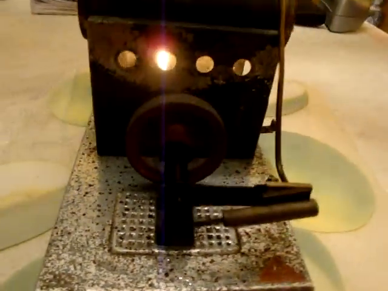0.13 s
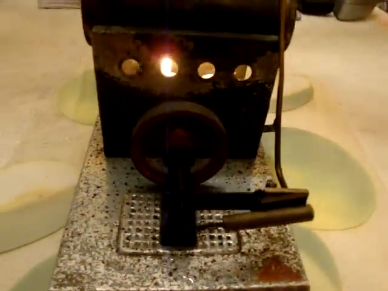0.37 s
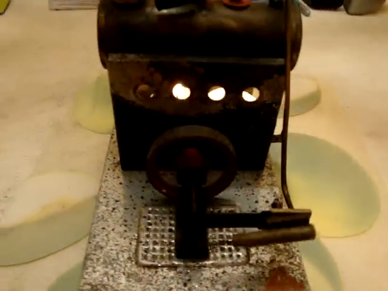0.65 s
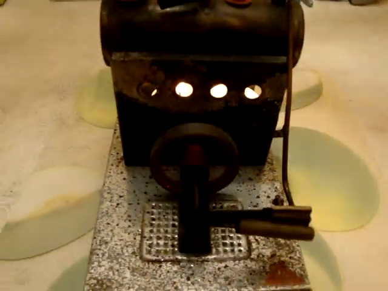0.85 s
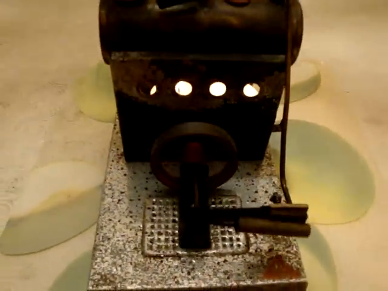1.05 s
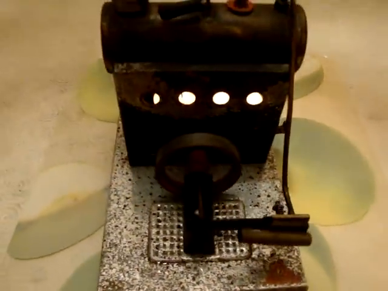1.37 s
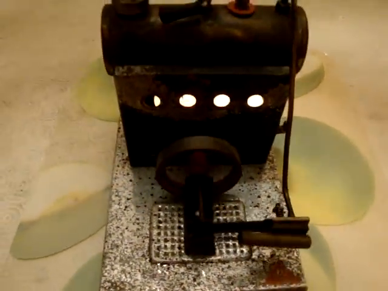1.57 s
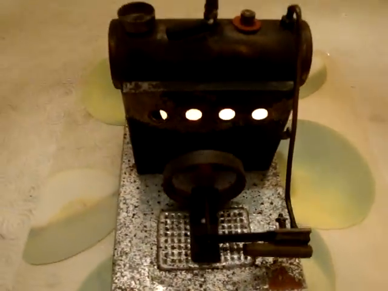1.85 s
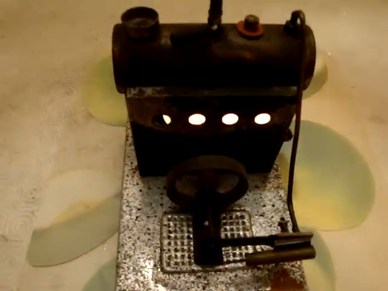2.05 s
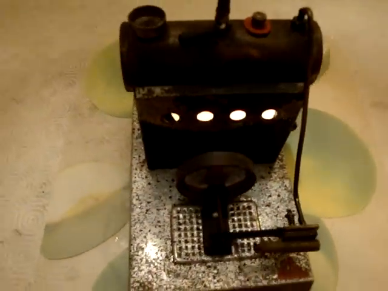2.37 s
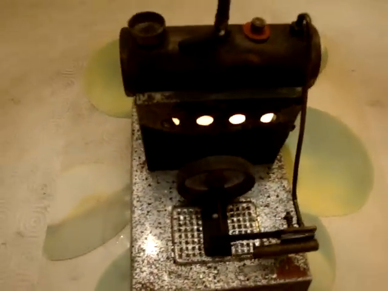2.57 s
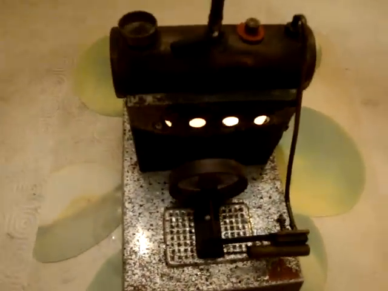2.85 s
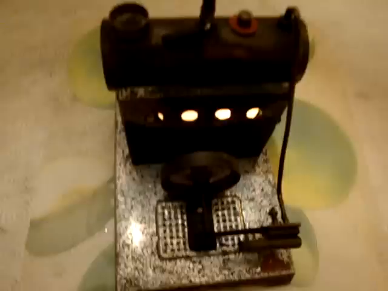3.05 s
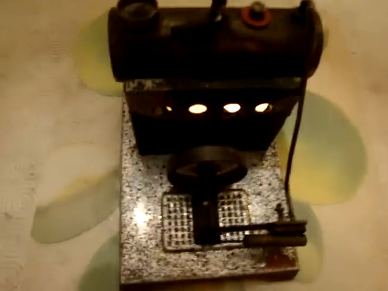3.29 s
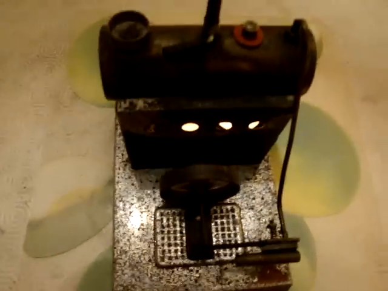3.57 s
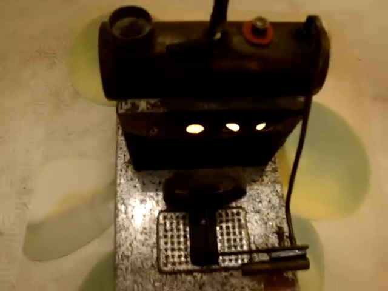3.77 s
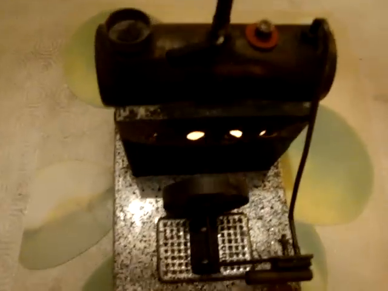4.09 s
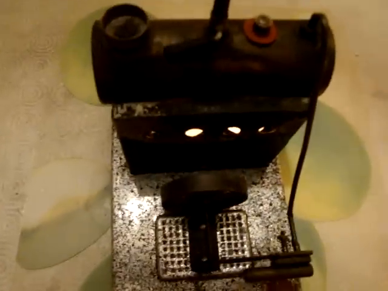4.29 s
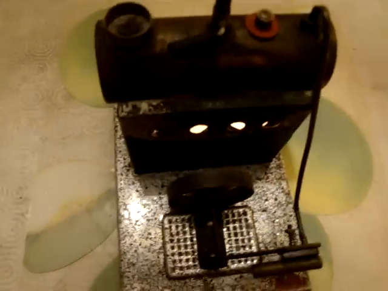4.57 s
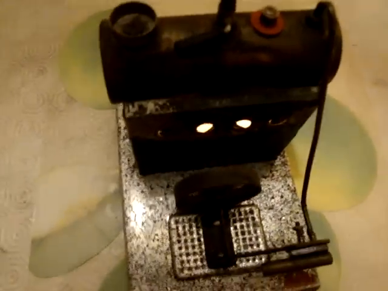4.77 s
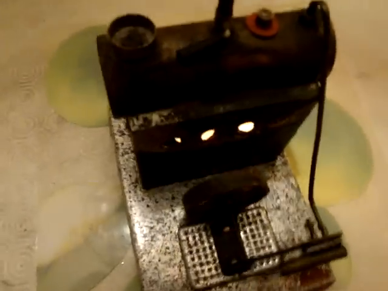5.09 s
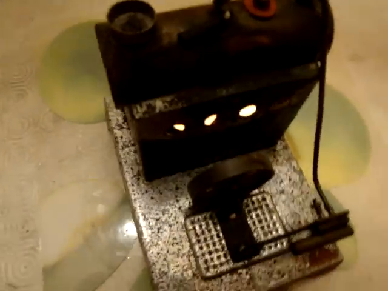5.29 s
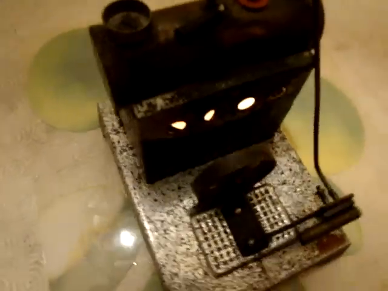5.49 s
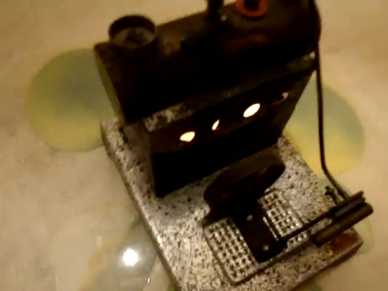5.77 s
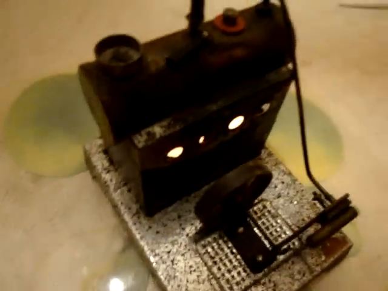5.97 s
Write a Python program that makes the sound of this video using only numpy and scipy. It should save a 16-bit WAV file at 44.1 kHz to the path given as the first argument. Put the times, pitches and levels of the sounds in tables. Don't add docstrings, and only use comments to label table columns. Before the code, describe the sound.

From 0 s a toy steam engine is already running on a table, close to a small handheld microphone. Around nine tinny piston knocks a second form a rapid, almost even chuffing, quickening very slightly; each knock has a double-hit edge, a short metal ring and a spit of steam lasting milliseconds. Between knocks come faint slack taps and gritty rubbing. A steady hiss of flame and steam lies beneath throughout. The front-on sound is brightest until about 1.2 s. Dull table bumps land near 1.06 s, softer at 1.2 s, and again at 2.27 s. From 2 to 4 s the microphone moves round the side: less spit, more ringing of the sheet-metal base. From 4 s the cylinder rocks on its seat nearly every turn, adding extra clacks and a stronger, busier clatter until the sound stops mid-run at about 6.1 s. Small, dry space; faint close echoes, little bass.

```python
import sys
import numpy as np
from scipy import signal
from scipy.fft import rfft, irfft
from scipy.io import wavfile

SR = 44100
rng = np.random.default_rng(int(sys.argv[2]) if len(sys.argv) > 2 else 0)


def level_to_linear(level):
    exponent = np.asarray(level, float) / 20
    return 10 ** exponent


def dump(signal):
    limited = np.clip(np.atleast_2d(signal).T, -1, 1)
    pcm = np.round(limited * 32767).astype(np.int16)
    wavfile.write(sys.argv[1], SR, pcm)


N = 270765

# frequency in Hz, level in dB per Hz.
HISS_SPECTRUM = [(40, -28), (60, -4.5), (75, -3.5), (100, -8.5), (120, 3.5), (170, -1), (280, 9), (500, 1),
                 (1000, 11), (3000, -1), (5000, -7.5), (7500, -6.5), (9800, -4), (11000, -43.5)]
# time in seconds, rattle in dB, side modes of the base in dB,
# front parts in dB.
MIC_VIEW = [
    (0, -43, -10, 5),
    (1.2, -41.5, -10.5, 6.5),
    (2.2, -41, -13.5, -8.5),
    (3.2, -41.5, -4.5, -9),
    (4, -39.5, -8, -6),
    (5, -39, -4.5, -6.5),
    (6.14, -40.5, -10, -6.5),
]
# share of the turn, level in dB.
STROKE_RUB = [(0, 10), (.2, 3.5), (.36, 4.5), (.46, -6), (.52, 1), (.61, -19), (.7, 3), (.85, 3.5),
              (1, 5.5)]

# frequency in Hz, level in dB, decay by 60 dB in seconds.
BASE_MODES = [(936.3, -14.5, 0.13), (973.6, -1.5, 0.036), (467, -23.5, 0.036), (609, -13, 0.042),
              (750.3, -11, 0.025), (825.7, -9, 0.049), (1131.2, -5.5, 0.076), (1170.4, -18, 0.19)]
CASING_MODES = [(1475.4, -8, 0.031), (1551, -3, 0.017), (1611.5, -9, 0.026), (1673, -22, 0.19)]
CYLINDER_MODES = [(2100.5, -5, 0.013), (2229.7, -2, 0.0097), (2444, -7, 0.02), (2834, -12.5, 0.018),
                  (2967, -16, 0.024), (3518, 2, 0.0098)]
FITTING_MODES = [(4130, -1, 0.0032), (4920, -15.5, 0.011), (5900, -3.5, 0.0033), (6940, -16, 0.012),
                 (8003, -4.5, 0.014), (9974, 0.5, 0.012)]
TABLE_MODES = [(288, 0.5, 0.05), (400, -8, 0.038), (506, 0.5, 0.042)]

DEAD_CENTRES = [-.2545, .2071, .6679, 1.129, 1.5826, 2.0322, 2.4774, 2.9205, 3.3585, 3.7959, 4.2285, 4.6608,
                5.0938, 5.5229, 5.9474, 6.37]
# time in seconds, ring of base, casing and cylinder in dB,
# steam spit in dB.
KNOCK_LEVELS = [(0, -28.5, -14, -21, -21), (.6, -21.5, -18.5, -20, -27), (1.2, -22, -15.5, -37, -29.5),
                (1.7, -21, -19, -25, -25), (2.1, -14.5, -17, -27, -25), (2.7, -20.5, -21, -31.5, -28),
                (3.2, -20.5, -17.5, -30, -25.5), (3.8, -15, -20, -21.5, -22),
                (4.5, -16.5, -18.5, -21.5, -24.5), (5.1, -16, -17, -26, -23), (5.6, -13.5, -14, -25, -21),
                (6.14, -15, -16, -22.5, -24.5)]
# time in seconds, harder in dB, casing in dB, wetter steam in dB.
UNUSUAL_KNOCKS = [(0.0872, 5.5, 3.5, 0.5), (0.2068, 6.5, 4, 0.5), (0.5506, 2.5, 0.5, -3),
                  (1.1307, 5.5, -11, -6), (1.2423, 0.5, -10, -4), (1.3553, -5, -3.5, -0.5),
                  (1.4685, 1, -4, -2), (1.5812, -4, 1.5, -0.5), (1.695, 3.5, -5, -0.5),
                  (1.92, 0.5, 4.5, 1.5), (2.1427, 1.5, -1.5, -1), (2.2545, 1.5, -13, 0), (2.4773, 2, 2, 0),
                  (2.7, -1, 4.5, 0.5), (2.811, 2.5, 4.5, 3.5), (3.4678, -4, -1.5, -1.5),
                  (3.5781, 2, 0.5, 2.5), (3.903, -4, 0.5, 1.5), (4.0149, 7, 1, 2), (4.1219, 2.5, 1, -2),
                  (4.2271, 0.5, 4.5, -2.5), (4.3376, 3.5, -3, 0.5), (4.445, -3, 1, -3),
                  (4.7729, -0.5, -2, 6), (5.0925, -3, -1.5, 2), (5.2022, -1, 3, -2.5), (5.3083, 2.5, -3, 0),
                  (5.5234, 1, 1.5, -1), (5.8409, -1, 1, -7), (5.9489, -0.5, 0.5, 2)]

# share of the turn, base, casing and cylinder in dB,
# loss on every other turn in dB.
LINKAGE_TAPS = [(.19, -60, -36, -38, 0), (.67, -40, -32, -42.5, -9), (.895, -34, -32.5, -42.5, -0.5)]
# base, casing, cylinder in dB against half the knock's swing.
RETURN_COLOUR = [-16, -24, -34.5]
# time in seconds, harder in dB.
UNUSUAL_RETURNS = [(.261, -0.5), (.38, -12), (.61, -23), (.84, -11), (.95, -17), (1.07, -12), (1.19, -6),
                   (1.3, -23), (1.52, -7), (1.64, -6.5), (1.862, 2.5), (2.09, -6.5), (2.2, -5), (2.42, 1.5),
                   (2.64, -14), (2.864, 4), (3.957, -4), (4.07, -1), (4.18, -5), (4.39, 2), (4.606, 4.5),
                   (4.714, 2), (4.83, -3.5), (5.04, -3.5), (5.147, -2.5), (5.253, 2.5), (5.36, -5),
                   (5.79, 2), (5.89, -8)]
# time in seconds, cylinder ring in dB.
ROD_CLINKS = [(.0097, -36), (.1848, -39), (.244, -32.5), (.352, -35.5), (.5833, -39), (.679, -34),
              (.7007, -35), (.715, -38), (.8763, -37), (1.2788, -36.5), (1.3353, -34.5), (1.562, -35),
              (1.7312, -34.5), (4.022, -24.5), (4.047, -38), (4.1125, -27.5), (4.126, -31), (4.779, -26),
              (4.87, -35.5)]
# time in seconds, base ring in dB.
SEAT_ROCKS = [(.0273, -38), (1.1147, -21.5), (1.7156, -34), (1.9551, -20.5), (3.2722, -21), (3.3438, -28),
              (3.5604, -25), (3.7688, -25.5), (3.8777, -28), (3.9339, -22), (3.992, -27), (4.0988, -19.5),
              (4.2087, -16.5), (4.246, -43), (4.5334, -19), (4.69, -25), (4.744, -22), (4.8027, -19.5),
              (4.8562, -17), (5.0691, -21), (5.0794, -16), (5.2903, -28), (5.396, -18.5), (5.5039, -18),
              (5.6131, -20), (5.7173, -16.5), (5.8233, -18), (5.9298, -17), (6.0356, -16), (6.1337, -18.5)]
# time in seconds, casing ring in dB.
CASING_JOLTS = [(.1679, -38), (.1925, -22.5), (.309, -41), (.4248, -27), (.5404, -30.5), (1.0011, -36),
                (1.2646, -31), (1.6827, -29), (2.104, -29), (2.3323, -37), (2.6616, -32.5), (2.8825, -36),
                (4.8281, -25.5), (5.6063, -30), (5.9218, -47)]
# base, casing, cylinder in dB.
CLINK_COLOUR = [2.5, -1, 5.5]
ROCK_COLOUR = [-5, -9, -16.5]
JOLT_COLOUR = [-12, 2.5, -13.5]
# time in seconds, peak in dB, pitch in Hz.
TABLE_BUMPS = [
    (1.061, -35, 400),
    (1.063, -36, 286),
    (1.063, -38, 476),
    (1.207, -44, 340),
    (2.265, -39.5, 432),
    (2.266, -45.5, 342),
]


def in_time(rows):
    s, *columns = np.transpose(rows)
    return [np.interp(np.arange(N) / SR, s, c) for c in columns]


def filtered(x, order, hz, kind):
    return signal.sosfilt(signal.butter(order, hz, kind, fs=SR, output="sos"), x)


def ring(clicks, hz, t60):
    r, w = level_to_linear(-60 / (t60 * SR)), 2 * np.pi * hz / SR
    return signal.lfilter([0, np.sin(w)], [1, -2 * r * np.cos(w), r * r], clicks + 1e-18)


def soften(x, seconds):
    r = np.exp(-1 / (seconds * SR))
    return signal.lfilter([1 - r], [1, -r], x)


def strikes(times, db, scatter_db):
    clicks = np.zeros(N)
    at = np.clip((times * SR).astype(int), 0, N - 1)
    clicks[at] = level_to_linear(db + scatter_db * rng.standard_normal(len(times)))
    return clicks


def hiss():
    hz = np.maximum(np.fft.rfftfreq(N, 1 / SR), 1)
    points_hz, points_db = np.transpose(HISS_SPECTRUM)
    colour_db = np.interp(np.log(hz), np.log(points_hz), points_db)
    noise = irfft(rfft(rng.standard_normal(N)) * level_to_linear(colour_db), N)
    return level_to_linear(-49.5) * noise / noise.std()


def rattle(rub_db):
    slips_per_s = 700
    clumps = soften(soften(rng.standard_normal(N), 0.0025), 0.0025)
    sizes = level_to_linear(3.0 * np.minimum(rng.exponential(1, N), 2.8)) * rng.choice([-1, 1], N)
    slipping = rng.random(N) < slips_per_s / SR
    return sizes * slipping * level_to_linear(rub_db - 1 + 3.5 * clumps / clumps.std())


def turn_times():
    return np.interp(np.arange(3, 60) / 4 - .25, np.arange(len(DEAD_CENTRES)), DEAD_CENTRES)


def piston():
    s, *levels = np.transpose(KNOCK_LEVELS)
    times = turn_times()[1:-1]
    knocks = np.transpose([times] + [np.interp(times, s, level) for level in levels])
    for at, harder, casing, wetter in UNUSUAL_KNOCKS:
        turn = np.argmin(abs(times - at))
        knocks[turn, 0] = at
        knocks[turn, 1:] += [harder, casing, 0.13 * casing + wetter, wetter]
    return knocks


def spit(low_db, taps):
    droplets, splutter_s, droplet_db = 3, 0.0054, -8
    knocks = piston()
    opening = strikes(knocks[:, 0] - .0015, knocks[:, 4], scatter_db=1)
    for late in rng.random((droplets, len(knocks))):
        level_db = knocks[:, 4] + droplet_db - 8 * late
        opening += strikes(knocks[:, 0] + splutter_s * late, level_db, scatter_db=4)
    puff = soften(soften(soften(level_to_linear(35) * opening, .0008), .0008), .0008)
    tail = soften(puff, 0.0036) * level_to_linear(-12)
    leak = level_to_linear(35) * strikes(taps[:, 0], taps[:, 3], scatter_db=1)
    leak = soften(soften(leak, 0.0029), 0.006)
    full = filtered(rng.standard_normal(N), 2, [3300, 6800], "band")
    thin = filtered(rng.standard_normal(N), 2, 6800, "high")
    return level_to_linear(-4.0) * (puff + tail) * (level_to_linear(low_db + 2.5) * full + thin) + leak * full


def slack():
    starts, lengths = turn_times()[:-1], np.diff(turn_times())
    view, running = np.array(MIC_VIEW), np.array(KNOCK_LEVELS)
    front_db = np.interp(starts, view[:, 0], view[:, 3])[:, None]
    even = np.arange(1, len(starts) + 1)[:, None] % 2
    looped = []
    for share, *db, loss in LINKAGE_TAPS:
        looped.append(np.c_[starts + share * lengths, front_db + loss * even + db])

    back = starts + .488 * lengths
    odd = sum(db * (abs(back - s) < .03) for s, db in UNUSUAL_RETURNS)
    swing_db = np.interp(back, running[:, 0], running[:, 1]) / 2 + odd
    looped.append(np.c_[back, swing_db[:, None] + RETURN_COLOUR])
    looped = np.vstack(looped)
    jitter_s, scatter_db = .0005, 2
    looped += rng.standard_normal(looped.shape) * [jitter_s, scatter_db / 3, scatter_db, scatter_db]

    single = []
    for rows, colour in ((SEAT_ROCKS, ROCK_COLOUR), (ROD_CLINKS, CLINK_COLOUR), (CASING_JOLTS, JOLT_COLOUR)):
        single += [(s, *(db + np.array(colour))) for s, db in rows]
    taps = np.vstack([looped, single])
    return taps[(taps[:, 0] > .002) & (taps[:, 0] < N / SR)]


def contact(hz, seconds):
    push = np.hanning(round(seconds * SR) + 3)[1:-1]
    return 2 * np.cos(2 * np.pi * hz * np.arange(len(push)) / SR) * push / push.sum()


def part(modes, taps, column, slips, late_s, build_s, bounce_db, knock_db, tap_db, rattle_db):
    bounce_s = .0072
    knocks, rings = piston(), []
    hit_s, hit_db = knocks[:, 0] + late_s, knocks[:, column] + knock_db
    tapped_db = taps[:, min(column, 3)] + tap_db
    for hz, db, t60 in modes:
        blows = strikes(hit_s, hit_db, scatter_db=1.5)
        blows += strikes(hit_s + bounce_s, hit_db + bounce_db, scatter_db=2.5)
        blows += strikes(taps[:, 0] - build_s / 3, tapped_db, scatter_db=1.5)
        blows += level_to_linear(rattle_db) * slips
        blows = signal.oaconvolve(blows, contact(hz, np.clip(build_s, 0, .008)))[:N]
        rings.append(level_to_linear(db) * ring(blows, hz, t60))
    return rings


def engine():
    level_db, side_db, low_db = in_time(MIC_VIEW)
    knocks, taps = piston()[:, 0], slack()
    turn_starts = np.r_[knocks[0] - .118, knocks, knocks[-1] + .105]
    turns = np.interp(np.arange(N) / SR, turn_starts, np.arange(len(turn_starts)))
    slips = rattle(level_db + np.interp(turns % 1, *np.transpose(STROKE_RUB)))

    base = part(BASE_MODES[:2], taps, column=1, slips=slips, late_s=0.00066, build_s=0.0025,
                bounce_db=-4.0, knock_db=-4.0, tap_db=1.0, rattle_db=-4.5)
    base += part(BASE_MODES[2:], taps, column=1, slips=slips, late_s=0.00038, build_s=0.0025,
                 bounce_db=-23, knock_db=-2.5, tap_db=-1.5, rattle_db=-3.5)
    casing = part(CASING_MODES, taps, column=2, slips=slips, late_s=-0.00035, build_s=0.0031,
                  bounce_db=-30.0, knock_db=-3.0, tap_db=0.5, rattle_db=-12.5)
    cylinder = part(CYLINDER_MODES[:-1], taps, column=3, slips=slips, late_s=-0.000905, build_s=0.00317,
                    bounce_db=-9, knock_db=-0.5, tap_db=4.5, rattle_db=-8.5)
    cylinder += part(CYLINDER_MODES[-1:], taps, column=3, slips=slips, late_s=-0.0005, build_s=0.0042,
                     bounce_db=-7.5, knock_db=-2.0, tap_db=2.5, rattle_db=-13.5)
    fittings = part(FITTING_MODES, taps, column=4, slips=slips, late_s=.0002, build_s=0.0015,
                    bounce_db=-19.5, knock_db=-2.5, tap_db=-9, rattle_db=-44)

    front_base = level_to_linear(low_db / 2 - 4.0) * base[0] + base[1] + level_to_linear(low_db) * base[2]
    base = front_base + level_to_linear(side_db) * sum(base[3:])
    fittings = level_to_linear(low_db) * sum(fittings[:4]) + level_to_linear(-low_db - 8.5) * fittings[4] + fittings[5]
    cylinder[-1] = cylinder[-1] * level_to_linear(side_db)
    grit = level_to_linear(-0.5) * filtered(slips, 2, [3200, 6500], "band")
    together = base + sum(casing) + sum(cylinder) + fittings + grit + spit(low_db, taps)
    return filtered(together, 4, 420, "high")


def table():
    knocks, push = piston(), np.zeros(N)
    push[((knocks[:, 0] + .003) * SR).astype(int)] = level_to_linear(knocks[:, 1] - 32.0)
    shake = ring(push * level_to_linear(-12.5), 83, 0.098)
    boom = np.zeros(N)
    for k, (hz, db, t60) in enumerate(TABLE_MODES):
        boom += (-1) ** k * level_to_linear(db) * ring(soften(push, 0.00057), hz, t60)
    for s, db, hz in TABLE_BUMPS:
        boom += ring(level_to_linear(db + 1) * (np.arange(N) == round(s * SR)), hz, 0.079)
    return shake + filtered(boom, 2, 200, "high")


def scene():
    near = engine() + table()
    echoes = np.zeros(round(.06 * SR))
    echoes[(rng.uniform(.003, .06, 30) * SR).astype(int) - 1] = rng.choice([-1, 1], 30)
    echoes *= level_to_linear(-26 - 300 * np.arange(len(echoes)) / SR)
    return (near + signal.fftconvolve(near, echoes)[:N] + hiss())[None]


def mute_quiet_treble(x, margin_db, luck_db, least_db):
    frame_s, frame_start_s = .036, .024
    _, at, cells = signal.stft(x, SR, nperseg=528, noverlap=264)
    band = np.arange(len(cells)) // 8
    power = np.add.reduceat(np.abs(cells) ** 2, np.arange(0, len(cells), 8)) / 8
    frame = np.floor((at - frame_start_s) / frame_s + 1).astype(int)
    first = np.flatnonzero(np.diff(frame, prepend=-1))
    attack = np.maximum.reduceat(power[5:].sum(axis=0), first)[frame]
    luck = .6 * rng.standard_normal(frame[-1] + 1)[frame] + rng.standard_normal(power.shape)
    height = np.clip(np.linspace(-.15, 1.8, len(power)), 0, 1)[:, None]
    need = np.sqrt(attack) * level_to_linear(2 * margin_db) + level_to_linear(2 * least_db)
    need = need * level_to_linear(2 * luck_db * luck) * height
    return signal.istft(cells * (power > need)[band], SR, nperseg=528, noverlap=264)[1][:N]


def roll_off(x):
    return signal.sosfilt(signal.butter(12, 10990, fs=SR, output="sos"), x)


def record(dry):
    thin = mute_quiet_treble(dry[0], margin_db=-46.0, luck_db=2.23, least_db=-95.5)
    top_edge = signal.cheby2(12, 45, 10300, fs=SR, output="sos")
    mix = signal.sosfilt(top_edge, thin)[None]
    return roll_off(mix)


dry = scene()
out = record(dry)
dump(out)
```